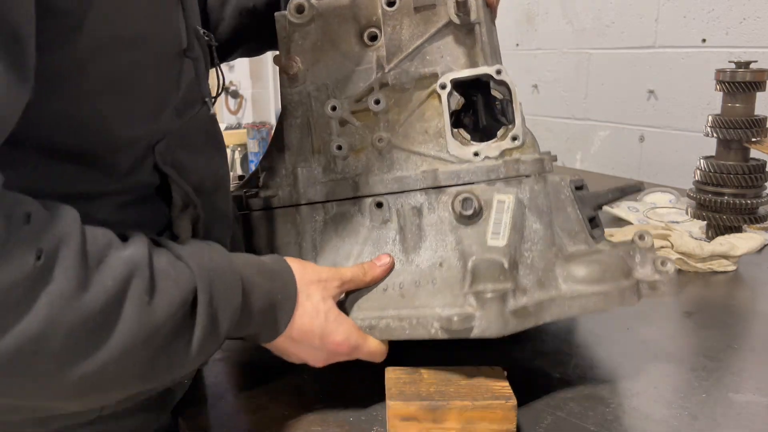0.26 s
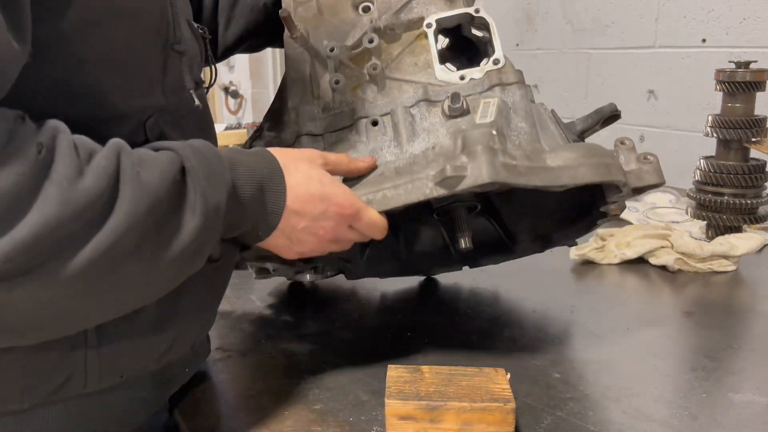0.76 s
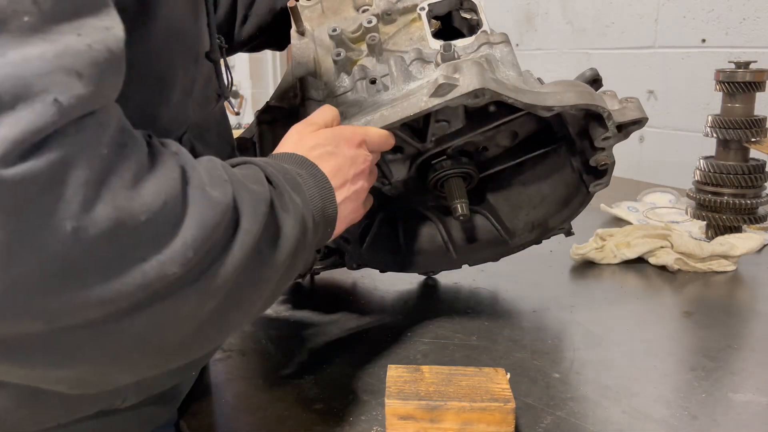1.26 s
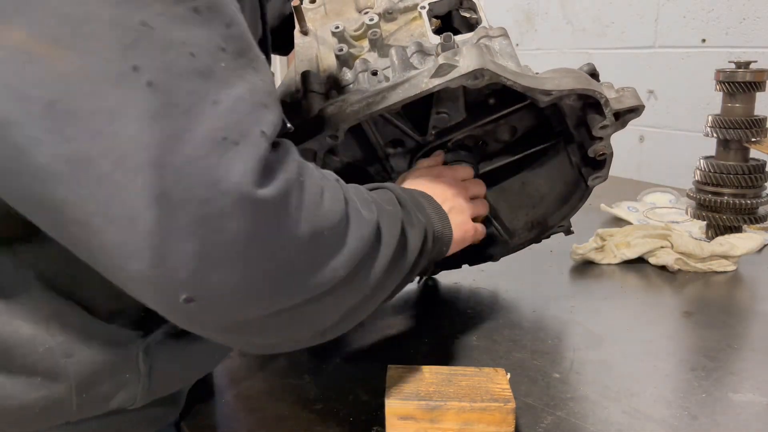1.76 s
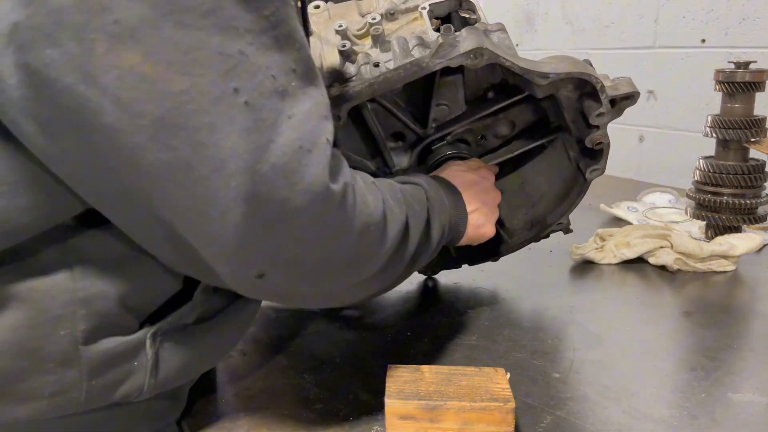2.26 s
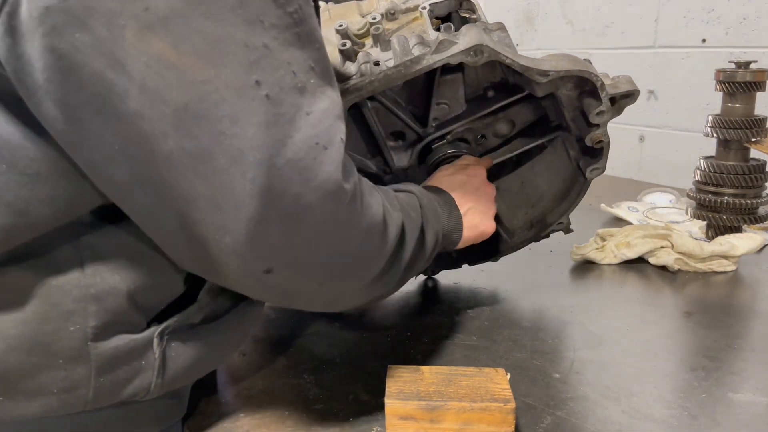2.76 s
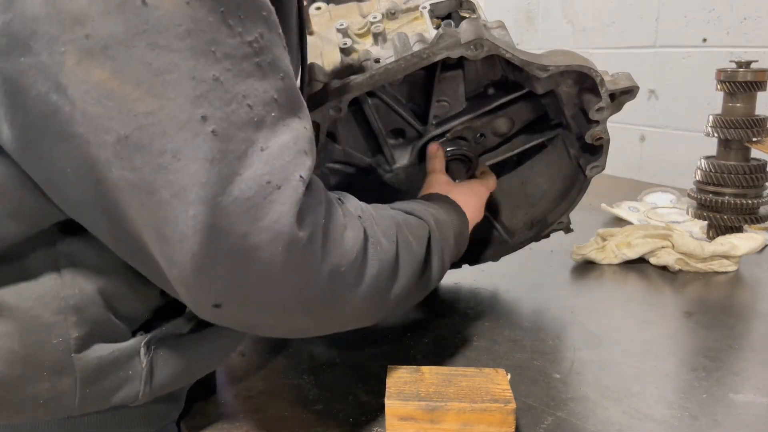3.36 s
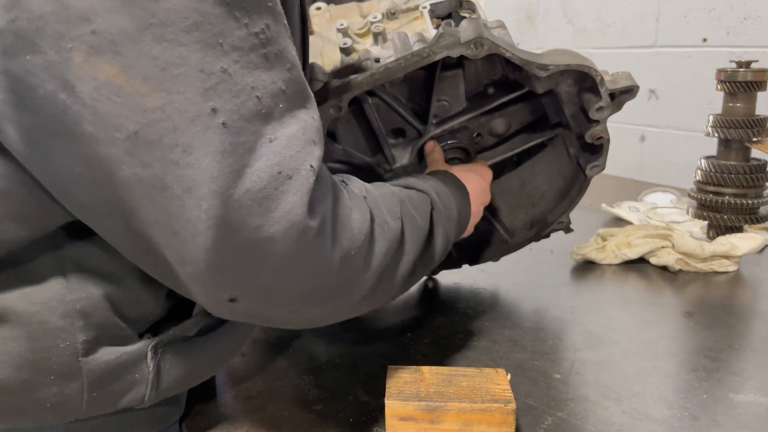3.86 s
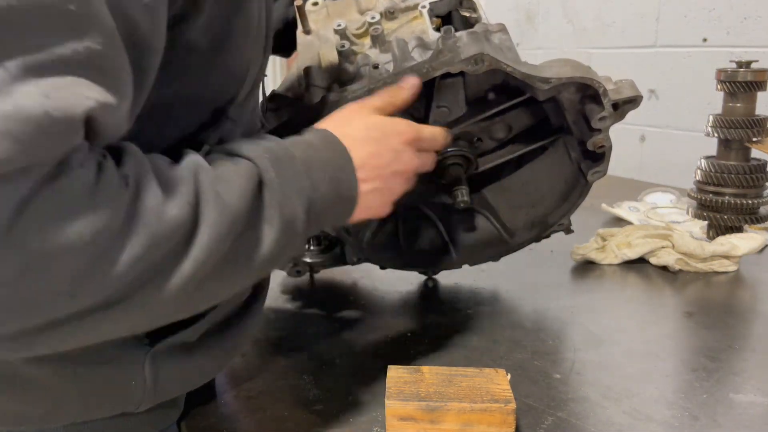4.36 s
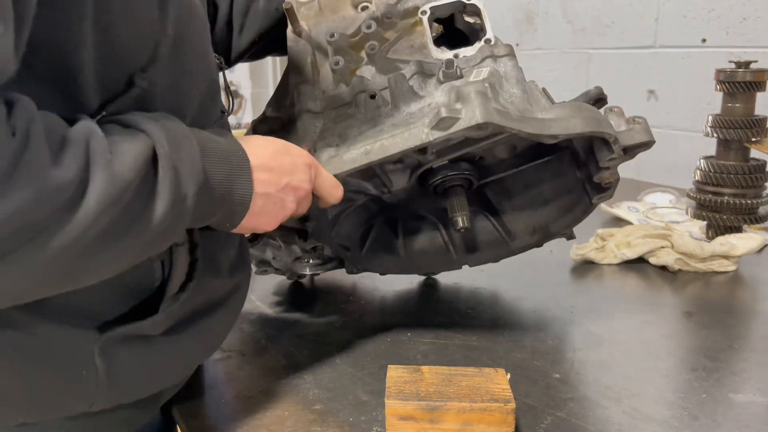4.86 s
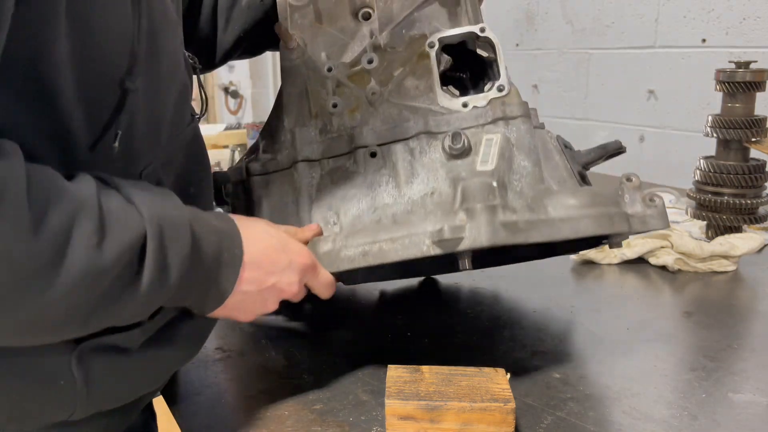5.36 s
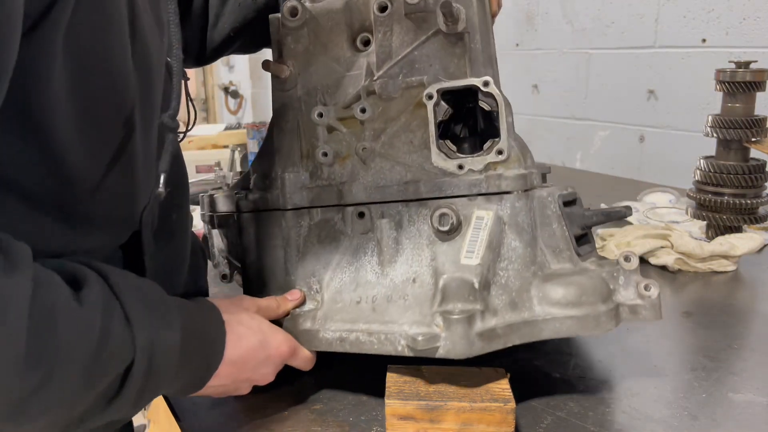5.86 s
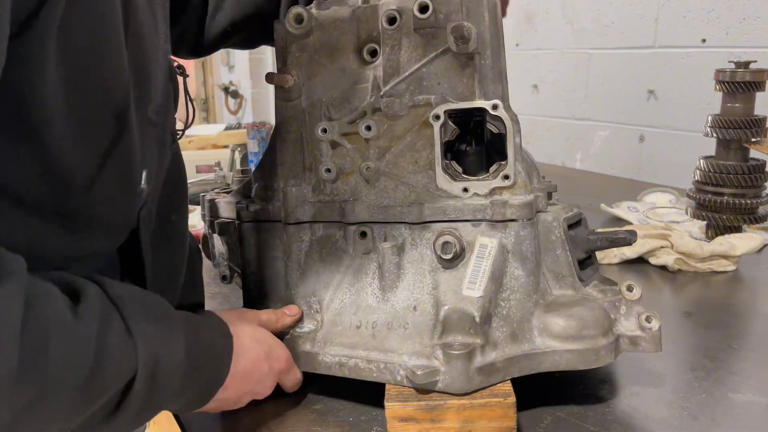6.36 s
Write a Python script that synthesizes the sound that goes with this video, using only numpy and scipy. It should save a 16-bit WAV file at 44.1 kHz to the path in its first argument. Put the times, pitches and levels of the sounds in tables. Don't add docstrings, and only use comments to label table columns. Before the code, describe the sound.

A close stereo view of a steel bench in a block-walled workshop, with quiet ventilation rumble and faint mains hum throughout. At the start an earlier bump still booms low; light contact and a tiny high squeak lead to the loudest event at 0.31 s, a hard metallic crash with ringing bell-like housing, buckling sheet and gritty skid. A softer, lower thump lands at 1.05 s. Then mostly ringing decay and sleeve rustle. From about 2.3 to 3.05 s gears clack in small, bright, irregular clicks over faint rubbing; around 3.5 to 3.65 s come lighter ticks, a gritty scrape and a thin ringing clink. Near-quiet with cloth movement follows. A muted thump at 4.8 s, small clicks, then at 5.75 s a dull thud, and a firmer knock at 6.07 s, followed by quick rocking bumps, low rolling rumble and small clinks until the end at about 6.6 s.

```python
import sys
import numpy as np
from scipy import signal
from scipy.fft import rfft, irfft, next_fast_len
from scipy.io import wavfile
from scipy.ndimage import map_coordinates

SR = 44100
rng = np.random.default_rng(int(sys.argv[2]) if len(sys.argv) > 2 else 0)


def boost_factor(decibels):
    exponent = np.asarray(decibels, float) / 20
    return 10 ** exponent


def master(y):
    cut = np.clip(np.atleast_2d(y).T, -1, 1)
    pcm = np.round(cut * 32767)
    wavfile.write(sys.argv[1], SR, pcm.astype(np.int16))


N = 291501
TIPPED_S, ON_WOOD_S = 0.9, 5.6
BEAT = 0.4


def unit(x):
    return x / np.sqrt(np.mean(x ** 2) + 1e-20)


def along(points, hz):
    f, v = np.transpose(points)
    return np.interp(np.log(hz + 1), np.log(f + 1), v)


def tilted(rows, slope_db, pivot_hz):
    return [(hz, db + slope_db * np.log2(hz / pivot_hz), *rest) for hz, db, *rest in rows]


def curve(rows):
    s, db = np.transpose(rows)
    return np.interp(np.arange(N) / SR, s, db, left=-150, right=-150)


def wobble(rate):
    knots = rng.standard_normal(int(N * rate / SR) + 4)
    return map_coordinates(knots, [np.arange(N) * rate / SR])


def filtered(x, response):
    m = next_fast_len(x.shape[-1] + 8192)
    return irfft(rfft(x, m) * response(np.fft.rfftfreq(m, 1 / SR)), m)[..., :x.shape[-1]]


def noise(spectrum, size):
    return unit(filtered(rng.standard_normal((2, size)), lambda hz: boost_factor(along(spectrum, hz))))


def peaks(resonances):
    def response(f):
        total = 0
        for k, (centre, width, db) in enumerate(resonances):
            damped = 1j * f * width
            total = total + (-1) ** k * boost_factor(db) * damped / (centre * centre - f * f + damped)
        return total
    return response


def driven(modes):
    return peaks([(hz, np.log(1000) / (np.pi * t60), db) for hz, db, t60 in modes])


def decay(t, t60):
    return boost_factor(-60 * t / t60)


def swell(t, rise):
    return 1 - np.exp(-(t / rise) ** 2)


def ring(modes, t, scatter_db, rise, beat=0):
    hz, db, t60 = np.transpose(modes)[:, :, None]
    phase = np.array([0, 1])[:, None, None] * rng.uniform(0, 2 * np.pi, hz.shape)
    gain = boost_factor(db + scatter_db * rng.standard_normal(hz.shape)) * decay(t, t60) * swell(t, rise)
    beat_hz, beat_phase = rng.uniform(6, 24, hz.shape), rng.random(hz.shape)
    twin = 1 + beat * np.sin(2 * np.pi * (beat_hz * t + beat_phase))
    return np.sum(gain * twin * np.sin(2 * np.pi * hz * t + phase), axis=1)


def blank(seconds):
    return np.zeros((2, N + 2 * SR)), np.arange(int(SR * seconds)) / SR


def add(track, s, sound, tails, wet_db):
    wet = signal.fftconvolve(sound, tails[rng.integers(len(tails))], axes=1)
    start = round(s * SR)
    track[:, start:][:, :wet.shape[1]] += boost_factor(wet_db) * wet
    track[:, start:][:, :sound.shape[1]] += sound


# (time [s], knock [dB], bench boom [dB], bench sheet [dB], sheet slope [dB/octave])
LANDINGS = [(0.1, -42.5, -54, -49.5, -3.5), (0.284, -30.5, -33.5, -41, 0), (0.3095, -9.5, -27, -25.5, 1),
            (0.321, -20, -36.5, -18.5, 2), (1.050, -35, -32, -33, -2), (1.074, -54, -54, -45.5, -4.5),
            (4.785, -36, -38, -34.5, -2), (5.44, -64, -50, -50, -0.5), (5.75, -33, -29.5, -31, -5.5),
            (5.811, -35.5, -38, -32, -3), (5.865, -47, -49.5, -39.5, -6.5), (6.055, -35, -48, -37.5, 1.5),
            (6.063, -24.5, -46, -34.5, 2), (6.074, -33.5, -29, -28.5, -8), (6.104, -46, -45, -31.5, -4),
            (6.1228, -51, -52, -51, -2), (6.148, -31.5, -41, -35, -3.5), (6.159, -66, -34.5, -36.5, -3.5),
            (6.2168, -38.5, -60, -37, -2), (6.2417, -55, -43, -48, 0), (6.278, -38.5, -43, -45, -9),
            (6.4009, -49, -45.5, -46.5, -7), (6.425, -50, -35.5, -43, -3), (6.4787, -42, -42, -57, 3),
            (6.512, -43, -37.5, -45.5, 1), (6.5548, -45, -41.5, -47, 3), (6.567, -42, -37.5, -52, -8)]
# (frequency [Hz], width [Hz], level [dB])
SHELL = [(567, 32, -2), (670, 17, 1), (740.5, 49, 3.5), (846.5, 31, 4), (868, 43, 3), (995, 200, 0.5),
         (1174, 61, 0), (1347, 110, -9.5), (1740, 220, -5.5), (2270, 150, -13)]
# (frequency [Hz], level [dB/Hz])
SOFT = [(250, -11), (450, 6.5), (1500, 10.5), (2500, -16), (4000, -16), (7000, -77.5), (12000, -101)]
# (frequency [Hz], level [dB/Hz])
GRIT = [(500, -20), (1300, 5.5), (1900, 5.5), (2600, 5), (4000, -5), (7000, -13.5), (9500, -13),
        (11600, -10.5), (12800, -39.5)]
# (frequency [Hz], level [dB], t60 [s])
BELL = [(550, 1, 0.84), (709, -7, 0.32), (769, -2, 0.25), (882, -5, .22), (1022, -7.5, 0.27),
        (1194, -6, 0.66), (1170, -3, 0.23), (1340, -2.5, 0.55), (1400, -2.5, .5), (1720, -7.5, 0.3),
        (1920, -15, 0.37), (2277, -11.5, 0.55)]
# (frequency [Hz], level [dB], t60 [s])
STRUCK = [(643.6, 0.5, 0.11), (739, -2, 0.17), (828, -2.5, 0.16), (892, -2.5, 0.1), (1023, -9.5, 0.22),
          (1138, -6.5, .1), (1265, -3, 0.3), (1371, -2.5, 0.11), (1668, -14, 0.084), (1745, -5, 0.05),
          (2020, -12, 0.13), (2360, -10.5, 0.15), (2360, -14.5, 0.11), (2745, -13, .09)]
# (frequency [Hz], level [dB], t60 [s])
BENCH = [(124.3, 1, 0.25), (143.8, -4, 0.34), (176.5, -10.5, 0.81), (217.8, 2.5, 0.16), (256.8, -6, 0.4),
         (301.3, 4, 0.16), (324.7, 2.5, 0.1), (370, -2, 0.04), (395.3, -7, 0.2), (446.5, 1.5, 0.14)]
# (frequency [Hz], level [dB], t60 [s])
BOOM = [(51, -12, 0.53), (66, 4, 0.58), (71.37, 4, 0.32), (101.55, -10.5, 0.66)]
# (level [dB], ..)
PLACES = [
    [0, 6, -0.5, -5.5, 0, -6.5, 2, -7, 1, -5.5],
    [0, -0.5, -4, 0, -5, 1.5, -6.5, 8, 2, -5],
]


def landings(tails):
    track, t = blank(0.7)
    for s, knock_db, boom_db, sheet_db, slope_db in LANDINGS:
        t60 = 0.17 * boost_factor(0.68 * (sheet_db - knock_db))
        contact = decay(t, max(t60, 0.01)) * swell(t, 0.0007)
        soft = noise(tilted(SOFT, 0.1 * (knock_db + 23), 700), len(t))
        knock = unit(filtered(soft, peaks(SHELL)))
        grit_db = knock_db - 31
        grit = noise(tilted(GRIT, 0.35 * min(grit_db + 34, 0), 3000), len(t))
        sound = contact * (boost_factor(knock_db - 11) * knock + boost_factor(grit_db + 11) * grit)

        wood_loss_db = 150 * t * (s > ON_WOOD_S)
        bell = ring(BELL, t, scatter_db=6, rise=0.0016, beat=BEAT)
        sound += boost_factor(1.35 * knock_db - 32 - wood_loss_db) * bell
        case = tilted(STRUCK, 0.1 * (knock_db + 10.5), 700)
        sound += boost_factor(knock_db - 15) * ring(case, t, scatter_db=1.5, rise=0.0007)

        place_db = PLACES[1] if s > ON_WOOD_S else np.multiply(PLACES[0], s > TIPPED_S)
        placed = [(hz, db + more_db, ring_s) for (hz, db, ring_s), more_db in zip(BENCH, place_db)]
        sheet = tilted(placed, slope_db, 220)
        rise = 0.0046 * 220 / np.array(sheet)[:, :1]
        damping = 0.49 + 0.56 * decay(t, 0.19)
        sound += boost_factor(sheet_db - 3) * damping * ring(sheet, t, scatter_db=2.5, rise=rise)
        sound += boost_factor(boom_db + 3) * ring(BOOM, t, scatter_db=1, rise=0.041)
        add(track, s, sound, tails, wet_db=-13.5)
    return track[:, :N]


# (time [s], level [dB], t60 [s])
SLAMS = [
    (.316, -21.5, 0.074),
    (.338, -24.5, 0.055),
    (5.752, -53.5, 0.032),
    (6.067, -38.5, .05),
    (6.152, -33, .04),
]
# (frequency [Hz], level [dB/Hz])
BUCKLE = [(100, -30), (200, -7.5), (290, -1), (440, -4.5), (500, -26), (1000, -43.5)]


def slams(tails):
    track, t = blank(0.7)
    for s, slam_db, t60 in SLAMS:
        burst = decay(t, t60) * (1 - np.exp(-t / 0.003)) * noise(BUCKLE, len(t))
        add(track, s, boost_factor(slam_db) * burst, tails, wet_db=-16)
    return track[:, :N]


# (time [s], peak [dB], half width [s], sheet down 1 or up -1 [sign])
PUSHES = [(0.3253, -14.5, 0.0012, 1), (1.056, -32.5, 0.00072, -1), (4.789, -29, 0.00096, -1),
          (5.7642, -26.5, 0.001, -1), (5.822, -30, 0.002, -1), (5.876, -35, 0.0014, 1),
          (6.080, -18.5, 0.0025, -1), (6.109, -25, 0.0018, -1), (6.164, -19.5, 0.0013, 1)]


def pushes(tails):
    track, t = blank(0.02)
    for s, push_db, width, way in PUSHES:
        u = (t - 0.01) / width
        pulse = (1 - u * u) * np.exp(-u * u / 2)
        add(track, s - 0.01, np.sign(way) * boost_factor(push_db) * pulse * [[1], [0]], tails, wet_db=-8.5)
    return track[:, :N]


# (time [s], level [dB], t60 [s], brightness [dB/octave])
SKIDS = [
    (0.319, -27.5, 0.17, 0),
    (.33, -43.5, 1.01, -4.5),
    (6.072, -42.5, 0.17, 3),
]


def skids(tails):
    track, t = blank(0.7)
    for s, skid_db, t60, bright_db in SKIDS:
        grit = noise(tilted(GRIT, bright_db, 3000), len(t))
        add(track, s, boost_factor(skid_db) * decay(t, t60) * (1 - np.exp(-t / 0.0025)) * grit, tails, wet_db=-12.5)
    return track[:, :N]


def earlier_landing():
    track, t = blank(0.7)
    track[:, :len(t)] += boost_factor(-22.5) * ring(BOOM, t + 0.22, scatter_db=0, rise=0.027)
    track[:, :len(t)] += boost_factor(-35) * ring(BENCH[:5], t + 0.11, scatter_db=0, rise=0.01)
    return track[:, :N]


# (time [s], clack [dB], chatter t60
# [s], brightness [dB/octave])
CONTACTS = [(.3005, -38, .05, -5),
            (0.1, -61, 0.15, 21), (0.153, -58, 0.04, -16), (1.27, -60, .08, -10), (1.4, -62, 0.13, -5),
          (1.44, -59, .08, -4), (2.309, -50, 0.094, 5), (2.4738, -50, 0.12, -4.5), (2.489, -44, 0.22, 2.5),
          (2.5028, -35, 0.07, 10), (2.5676, -37, 0.0073, 0), (2.674, -63, 0.035, 11), (2.73, -39, 0.12, 2),
          (2.7427, -52, 0.027, 15), (2.7649, -36, 0.11, 5.5), (2.7759, -55, 0.019, 7),
          (2.804, -56, 0.029, -10), (3.008, -45.5, 0.13, 0), (3.0411, -36, 0.059, 8), (3.4942, -61, .03, 0),
          (3.511, -57, 0.034, 7), (3.528, -50, 0.033, -9), (3.5477, -51, 0.03, -8), (3.575, -55, 0.026, 6),
          (3.6197, -50, 0.021, 15), (3.681, -57, 0.04, -8), (3.999, -71.5, 0.084, 22),
          (4.829, -52.5, 0.1, 4), (4.911, -49, 0.049, -1), (5.0686, -56, 0.24, 3),
          (5.0998, -56.5, 0.088, 3), (5.8335, -63, 0.08, 5.5), (6.056, -50.5, 0.068, 27),
          (6.2772, -47.5, 0.034, 18), (6.45, -46, 0.052, -9)]
# (frequency [Hz], level [dB/Hz])
TEETH = [(500, -12.5), (1200, 14), (2500, 12.5), (4000, 3.5), (7000, -1), (9500, -15.5), (11300, -12.5),
         (12600, -75.5)]
# (frequency [Hz], level [dB/Hz])
BODY = [(80, -23.5), (200, -1), (300, 2.5), (600, -8), (1200, -7.5), (2500, -46.5)]
# (frequency [Hz], level [dB], t60 [s])
GEARS = [(754, -4, .04), (1150, -5, .03), (1640, -2, .03), (1920, -5, .025), (2210, -7, .02),
         (2610, -1, .035), (4040, 0, .04), (4520, -6, .02), (5010, -8, .02)]


def clacks(tails):
    track, t = blank(0.25)
    for s, clack_db, t60, bright_db in CONTACTS:
        lumps = np.repeat(rng.standard_normal(len(t) // 60 + 1), 60)[:len(t)]
        chatter = boost_factor(3.7 * lumps) * decay(t, max(t60, 0.005)) * (1 - np.exp(-t / 0.00039))
        sound = boost_factor(clack_db - 11.5) * chatter * noise(tilted(TEETH, bright_db, 3000), len(t))
        body_db = -53.5 + 0.74 * (clack_db + 49)
        sound += boost_factor(body_db - 9) * decay(t, 0.23) * swell(t, 0.0027) * noise(BODY, len(t))
        sound += boost_factor(body_db - 14) * ring(BENCH[3:], t, scatter_db=2, rise=0.0073)
        if 2.4 < s < 3.2:
            sound += boost_factor(clack_db - 17) * ring(GEARS, t, scatter_db=5.5, rise=0.0017)
        add(track, s, sound, tails, wet_db=-14.5)
    return track[:, :N]


# (time [s], short clink [dB], beating pair [dB], third mode [dB], upper modes [dB])
PINGS = [(2.251, -77.5, -87, -100, -101), (2.492, -44.5, -85, -96, -94), (2.57, -53, -90, -95, -95),
         (2.801, -59, -93, -93, -93), (3.011, -56, -93, -86, -88), (3.528, -70, -72, -90, -82),
         (3.549, -72, -69, -90, -80), (3.58, -75, -77, -90, -90), (3.6201, -41, -74, -69, -96),
         (5.833, -67, -79, -79, -79), (6.277, -57, -63.5, -58, -66), (6.451, -72, -70, -75, -68),
         (6.566, -70, -85, -88, -83)]
# (frequency [Hz], level [dB], t60 [s])
CASING = [
    [(1733, -6, .04), (1930, -4, .045), (2545, 0, .065), (3120, -14, .04), (880, -14, .03), (1560, -8, .03),
     (4300, -16, .04), (4700, -17, .03), (6100, -14, .03)],
    [(2433, -10, .4), (2503, -6, .55), (2536, 0, .6), (2705, -5, .2)],
    [(3066, 0, .5), (3090, -18, .2)],
    [(4230, 0, .4), (7550, -12, .12)],
]
# (frequency [Hz], level [dB], t60 [s])
STANDING = [
    [(2120, -3, .05), (2720, -2, .06), (3074, 0, .06), (4215, -6, .05), (4750, -10, .03)],
    [(2503, 0, .42), (2715, -4, .13)],
    [(3074, 0, .22)],
    [(4215, 0, .3), (7553, -12, .12)],
]


def pings(tails):
    track, t = blank(0.7)
    for s, *levels in PINGS:
        groups = STANDING if s > ON_WOOD_S else CASING
        beat = BEAT * (s < ON_WOOD_S)
        sound = 0
        for db, modes in zip(levels, groups):
            sound = sound + boost_factor(db) * ring(modes, t, scatter_db=3, rise=0.00095, beat=beat)
        add(track, s, sound, tails, wet_db=-24.5)
    return track[:, :N]


# (time [s], level [dB])
SCRAPE = [(3.48, -94), (3.51, -72), (3.53, -60.5), (3.56, -61.5), (3.6, -60.5), (3.63, -59), (3.7, -85)]
# (frequency [Hz], level [dB], t60 [s])
SHAFT = [(726, 12, 0.082), (942, 10, .12), (1365, -3, 0.11), (1885, 0.5, .07), (2480, 9.5, 0.52),
         (2700, 0, 0.23), (3170, 1, 0.18), (4230, -10, .17), (4690, -12, .06)]


def scrape():
    rough = unit(boost_factor(5 * wobble(120)) * noise(TEETH, N))
    sound = boost_factor(curve(SCRAPE)) * rough
    return boost_factor(-6) * sound + boost_factor(6) * filtered(sound, driven(SHAFT))


# (time [s], level [dB])
ROLL = [
    [(5.8, -46.5), (6.05, -50), (6.12, -44), (6.2, -48), (6.28, -40), (6.38, -51), (6.45, -41), (6.53, -40),
     (6.61, -36.5)],
]
# (time [s], level [dB])
ROCK = [(6.07, -54.5), (6.1, -43.5), (6.15, -37.5), (6.2, -54), (6.23, -48), (6.3, -51), (6.38, -56),
        (6.43, -48), (6.48, -62), (6.53, -56), (6.61, -51)]
# (frequency [Hz], level [dB], t60 [s])
ROCK_MODE = [(300.8, 0, .25)]


def rolling():
    bumps = boost_factor(3.8 * wobble(25)) * rng.standard_normal((2, N))
    rumble = unit(filtered(bumps, driven(BOOM))) + 0.5 * unit(filtered(bumps, driven(BENCH)))
    rumble = filtered(rumble, lambda hz: 1 / (1 + (hz / 300) ** 2))
    rocking = unit(filtered(bumps, driven(ROCK_MODE)))
    return sum(boost_factor(curve(rows)) for rows in ROLL) * rumble + boost_factor(curve(ROCK)) * rocking


# (time [s], level [dB])
SQUEAK = [(.178, -87), (.2, -82), (.225, -78), (.245, -64), (.26, -64.5), (.285, -59.5), (.305, -75.5)]
# (frequency [Hz], width [Hz], level [dB])
RIM = [(4690, 200, 0.5), (6300, 360, -4), (8130, 200, -0.5), (9510, 340, 0), (11020, 200, 4.5)]


def squeak():
    slips = boost_factor(3 * wobble(70)) * rng.standard_normal((2, N))
    return boost_factor(curve(SQUEAK)) * unit(filtered(slips, lambda hz: peaks(RIM)(hz) ** 2))


# (time [s], length [s], level [dB])
RUBS = [
    (2.543, 0.52, -64),
    (3.095, 0.39, -72.5),
    (5.316, 0.24, -64),
]


def rubs():
    s, length, db = np.transpose(RUBS)[:, :, None]
    arch = np.sin(np.pi * np.clip((np.arange(N) / SR - s) / length, 0, 1))
    level = np.sum(boost_factor(db) * arch, axis=0) * boost_factor(6.4 * wobble(36))
    sheet = unit(filtered(noise(BODY, N), driven(BENCH[3:7])))
    return level * (noise(BODY, N) + 0.42 * sheet)


# (time [s], length [s], hiss [dB], swish
# [dB])
SLEEVES = [(0, 0.082, -88, -64), (0.16, 0.11, -77, -66.5), (0.345, 0.17, -82, -45), (.52, 0.57, -83, -56),
           (0.86, 0.086, -93, -62), (1.245, 0.09, -99, -68), (1.368, 0.09, -99, -66.5),
           (1.497, 0.51, -75, -65.5), (2.037, 0.23, -99.5, -75), (2.495, 0.28, -100, -60),
           (3, 0.24, -99, -65), (4.0, 0.15, -88.5, -78), (4.174, 0.8, -89, -70.5),
           (4.674, 0.17, -77, -59.5), (4.878, 0.17, -83, -62), (5.04, 0.26, -94, -63.5),
           (5.174, 0.26, -88, -73), (5.333, 0.21, -93, -65), (6.04, 0.24, -76, -85),
           (6.262, 0.22, -73, -52.5)]
# (frequency [Hz], level [dB/Hz])
HISS = [(5000, -26), (7500, -13.5), (9300, 8.5), (10200, 18.5), (11200, 8), (12200, -17), (13000, -60)]
# (frequency [Hz], level [dB/Hz])
SWISH = [(900, 9.5), (2000, 2.5), (3500, -5.5), (5000, -6), (8000, -15.5), (12000, -41)]


def sleeves():
    s, length, hiss_db, swish_db = np.transpose(SLEEVES)[:, :, None]
    t = np.arange(N) / SR - s
    edges = np.clip(t / 0.07, 0, 1) * np.clip((length - t) / 0.12 + 1, 0, 1)
    stroke = edges * boost_factor(-18.5 * np.clip(t, 0, 2))
    rub = wobble(28)
    hiss = np.sum(boost_factor(hiss_db) * stroke, axis=0) * boost_factor(5.5 + 1.4 * rub + 1.3 * wobble(50))
    swish = np.sum(boost_factor(swish_db) * stroke, axis=0) * boost_factor(-8 + 2.7 * rub + 1.3 * wobble(48))
    return hiss * noise(HISS, N) + swish * noise(SWISH, N)


# (frequency [Hz], level [dB/Hz])
HUM = [(20, -19.5), (45, 5.5), (94, 0.5), (189, -13.5), (422, -20.5), (520, -21.5), (1130, -23),
       (1360, -19.5), (2660, -43), (7130, -53), (9250, -51.5), (10000, -40), (11100, -46), (12300, -60.5),
       (16000, -100), (22000, -120)]
# (frequency [Hz], level [dB rms])
MAINS = [(242.2, -82), (360.7, -83.5), (419.9, -86.5), (1082, -96), (1200, -91), (1561, -95.5)]


def workshop():
    t = np.arange(N) / SR
    air = boost_factor(-59.5 + 0.4 * wobble(0.74)) * noise(HUM, N)
    for hz, db in MAINS:
        tone = np.sin(2 * np.pi * hz * t + rng.uniform(0, 5.43, (2, 1)))
        air += boost_factor(db + 6 + 1.8 * wobble(1)) * tone
    return air


# (frequency [Hz], t60 [s])
WALLS = [(60, 1.3), (250, 0.96), (1000, 1.63), (3000, 1.48), (6000, 0.69), (11000, 0.36)]


def walls():
    hz, t, z = signal.stft(rng.standard_normal((2, SR)), SR, nperseg=256)
    z = z * decay(t, along(WALLS, hz)[:, None])
    tail = signal.istft(z, SR, nperseg=256)[1]
    tail *= np.clip(np.arange(tail.shape[1]) / (0.0012 * SR), 0, 1)
    return tail / np.linalg.norm(tail[0])


def ports(pair, alike, tilt, turn):
    def mixing(hz):
        angle = np.arccos(np.clip(along(alike, hz), -1, 1)) / 2
        return np.array([np.cos(angle), np.sin(angle)])

    def skew(hz):
        left = boost_factor(along(tilt, hz) / 2) * np.exp(-0.5j * along(turn, hz))
        return np.array([left, 1 / left])

    same, other = filtered(pair, mixing)
    return filtered(np.array([same + other, same - other]), skew)


# (frequency [Hz], coherence [0-1])
ALIKE = [(60, .99), (150, .97), (300, .9), (600, .6), (1500, .45), (6000, .45), (8500, .7), (9700, .97),
         (10150, .999), (10600, .95), (12000, .85)]
# (frequency [Hz], level [dB])
TILT = [(60, -2.4), (300, -1.5), (1000, -2), (4000, 2.5), (8500, 1), (9800, 0)]
# (frequency [Hz], phase [rad])
TURN = [(250, 0), (1000, 1.5), (2000, 2), (3200, 4.7), (4000, 5.5), (8500, 6), (9300, 7.5), (9800, 9.2),
        (10400, 9.6), (11000, 11), (12100, 12.5)]
# (frequency [Hz], level [dB])
SHAFT_TILT = [(60, -2), (2000, -1), (4500, 1), (9800, 0)]
# (frequency [Hz], phase [rad])
SHAFT_TURN = [(250, 0), (1100, 1.3), (2200, .3), (4500, -.8), (8500, -.3), (9300, 1.2), (9800, 2.92),
              (10400, 3.32), (11000, 4.7), (12100, 6.2)]
# (frequency [Hz], coherence [0-1])
ROOM_ALIKE = [(60, .94), (130, .9), (270, .4), (600, .2), (6000, .15), (8500, .6), (9700, .97),
              (10150, .999), (10600, .95), (12000, .85)]
# (frequency [Hz], level [dB])
ROOM_TILT = [(60, 0), (300, 1), (700, 3), (4000, 4), (8500, 1), (9800, 0)]


def scene():
    tails = [walls() for _ in range(12)]
    impacts = landings(tails) + slams(tails) + pushes(tails) + skids(tails) + earlier_landing()
    bench = ports(impacts + rolling() + squeak() + rubs(), ALIKE, TILT, TURN)
    shaft = ports(clacks(tails) + pings(tails) + scrape(), ALIKE, SHAFT_TILT, SHAFT_TURN)
    surroundings = ports(sleeves() + workshop(), ROOM_ALIKE, ROOM_TILT, TURN)
    return bench + shaft + surroundings


def roll_off(x):
    return signal.sosfilt(signal.butter(12, 12450, fs=SR, output="sos"), x)


def record(dry):
    b, a = signal.butter(3, 44, "high", fs=SR)
    lead = SR // 10
    padded = np.pad(dry, ((0, 0), (lead, 0)), "reflect")
    mix = signal.lfilter(b, a, padded)[:, lead:]
    return roll_off(mix)


dry = scene()
out = record(dry)
master(out)
```